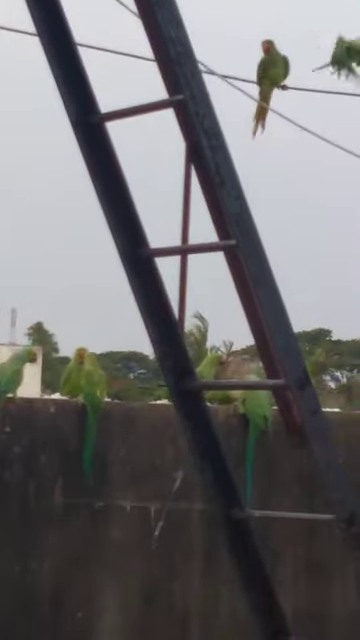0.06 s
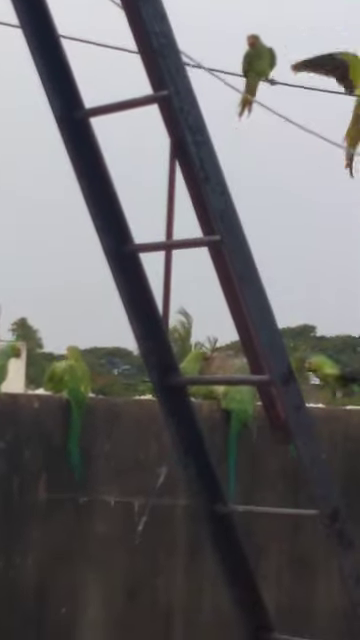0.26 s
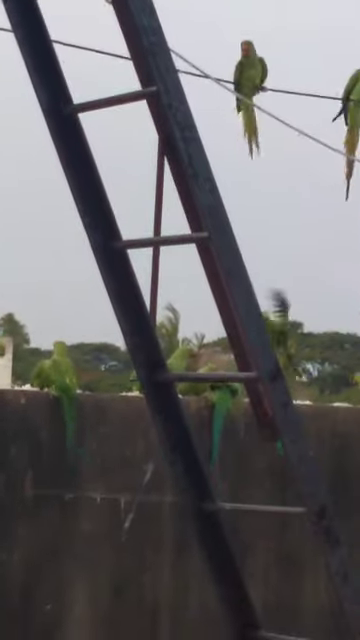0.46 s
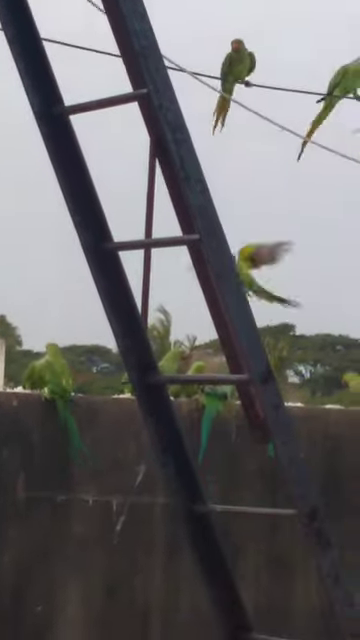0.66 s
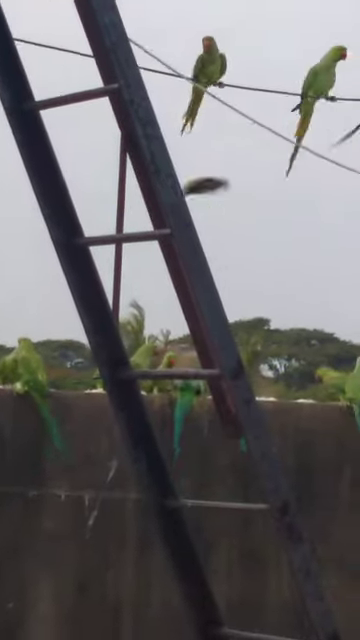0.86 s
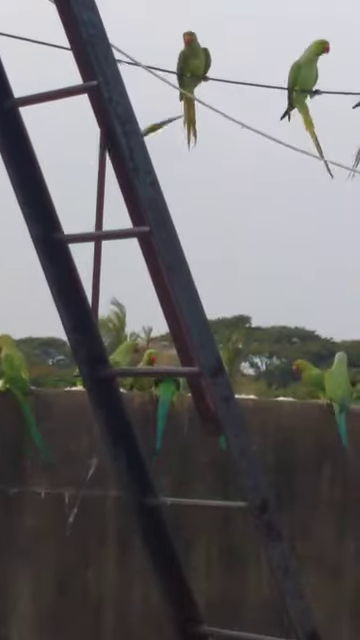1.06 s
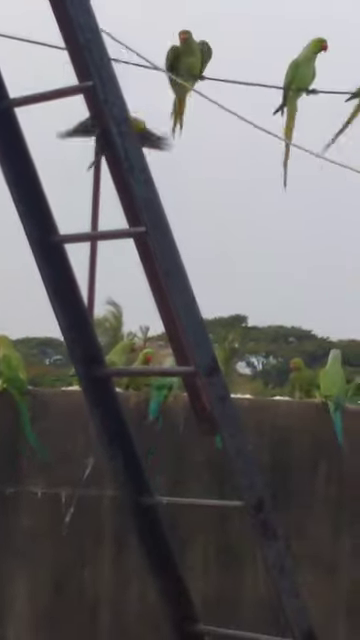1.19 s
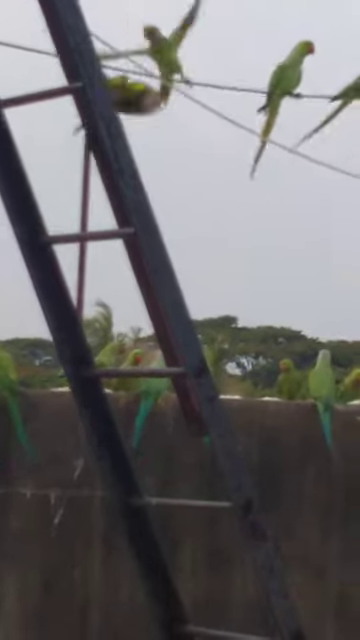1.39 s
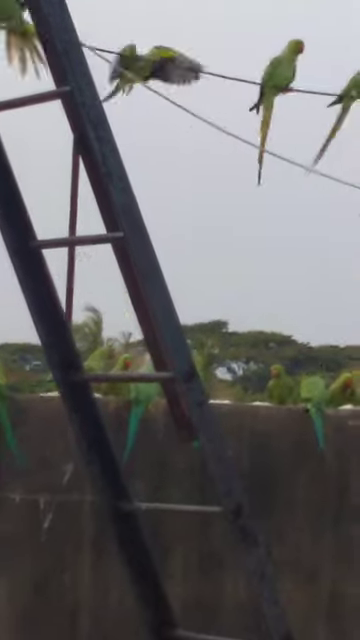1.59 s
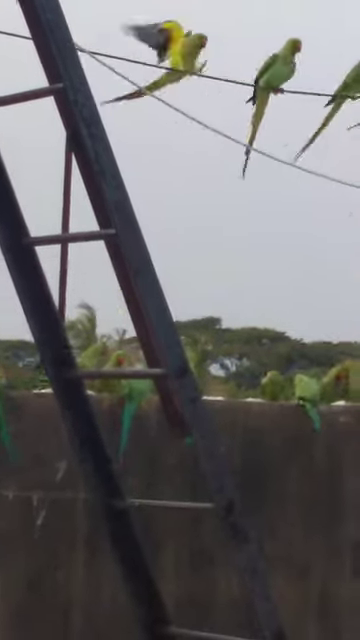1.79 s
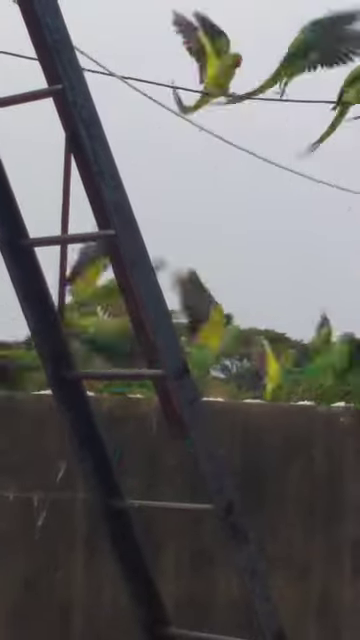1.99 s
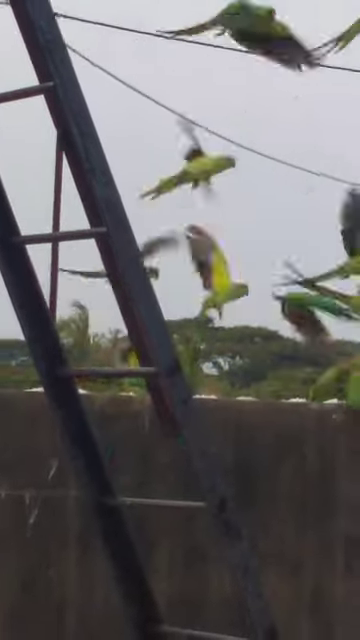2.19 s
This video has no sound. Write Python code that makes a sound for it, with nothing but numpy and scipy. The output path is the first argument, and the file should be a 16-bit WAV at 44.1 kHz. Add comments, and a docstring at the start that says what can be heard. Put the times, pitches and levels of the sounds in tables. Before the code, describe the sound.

Harsh, bright parakeet calls leap up and fall, about four a second, with short echoes from rooftop walls; a few softer calls, faint distant hum, then low gusts and a final cluster of wingbeats.

```python
"""Town noise and a wavering hum come first; over them a parakeet on a rooftop screeches eight times in a fast run.
Each call is a sum of partials of a pitch that leaps up, arches and falls, shaped by throat resonances and
roughened by modulation and hiss; the first two warble, and three softer calls join in.
Walls and parapets return the calls as echoes and decaying noise. Filtered noise makes the late gusts that rumble
on the microphone and the wings: a faint rustle, one early puff and a cluster of beats at the end."""
import sys
import numpy as np
from scipy import signal
from scipy.fft import rfft, irfft
from scipy.io import wavfile

SR = 44100
rng = np.random.default_rng(int(sys.argv[2]) if len(sys.argv) > 2 else 0)


def int16_out(signal):
    """Quantize to a 16-bit WAV file."""
    q = np.round(np.clip(np.atleast_2d(signal).T, -1, 1) * 32767)
    wavfile.write(sys.argv[1], SR, q.astype(np.int16))


def ratio(d):
    """dB to gain"""
    e = np.asarray(d, float) / 20
    return 10 ** e


N = 99225
TIME = np.arange(N) / SR

# Relative noise spectrum of the town: (frequency [Hz], level [dB])
TOWN_SPECTRUM = [(15, -10), (25, 0.5), (104, 0.5), (204, -5), (297, -3.5), (457, -6.5), (567, -18),
                 (762, -2.5), (1050, -10.5), (1380, -6.5), (2490, -3), (2920, -26.5), (3170, -16),
                 (15500, -49)]
TOWN_DB = -44.5
# Tones of the hum: (frequency [Hz], mid level [dB])
HUM_TONES = [(361, -62), (394, -60), (570, -64)]
# Strength of the wind's deep rumble: (time [s], level [dB])
GUST_LEVEL = [(1.45, -51), (1.536, -76), (1.572, -40.5), (1.648, -35.5), (1.744, -43), (1.78, -60),
              (1.938, -44), (1.966, -65), (1.99, -41), (2.084, -40), (2.108, -55), (2.142, -38.5),
              (2.2, -45)]
GUST_CUT_HZ, GUST_LUMPS_DB = 55, 2
# Single puffs of the wings: (start time [s], peak level [dB])
WING_PUFFS = [(.39, -50), (2.061, -67), (2.115, -56), (2.201, -57), (2.24, -46)]
# Continuous rustle of feathers: (time [s], level [dB])
FEATHER_RUSTLE = [(0, -68), (.2, -69.5), (1.599, -83), (2.0, -63), (2.25, -58)]
WING_RISE_S, WING_LOW_HZ = 0.025, 1500

# Echoes from parapet and floor, relative to the direct sound: (delay [s], level [dB])
NEAR_ECHOES = [(.006, -11.5), (.0095, -8), (.017, -25.5), (.026, -18.5)]
# Time for the scattered sound to fall 60 dB: (frequency [Hz], decay time [s])
ROOF_DECAY = [(1000, 1), (2300, 0.67), (4500, 0.59), (9000, 0.43), (16000, 0.75)]
# Relative starting spectrum of the scattered sound: (frequency [Hz], level [dB])
ROOF_SPECTRUM = [(2000, -0.5), (5000, -1), (9000, 0), (16000, -4)]
ROOF_DB, ROOF_BUILD_S = -8.5, 0.0033  # scattered energy against direct; time constant of its onset

# Arched calls, one contour each: (time [s], pitch [Hz], level [dB], hoarseness [0-1])
ARCHED_CALLS = [
    [(0.657, 1360, -36, 0), (0.669, 1412, -33.5, 0.22), (0.683, 2124, -32, 0.3), (0.689, 2457, -17, 0.27),
     (0.691, 2445, -21.5, 0), (0.707, 2448, -23.5, 0.33), (0.721, 2470, -22.5, 0.02),
     (0.751, 2199, -17.5, 0.3), (0.765, 2068, -21, 0), (0.785, 1892, -21, 0.33), (0.802, 1514, -44, 0.1)],
    [(0.892, 1335, -26, 0.22), (0.902, 1406, -39.5, 0.2), (0.916, 1956, -23.5, 0), (0.922, 2156, -23, 0),
     (0.93, 2361, -19.5, 0), (0.956, 2366, -18, 0), (0.994, 2128, -23.5, 0.04), (1.014, 1910, -22.5, 0.1),
     (1.022, 1767, -28, 0.03), (1.037, 1514, -37, 0.22)],
    [(1.117, 1380, -42, 0), (1.127, 1484, -40, 0), (1.133, 1700, -35, 0.22), (1.147, 2237, -18, 0.1),
     (1.151, 2388, -18, 0), (1.161, 2350, -17, 0.12), (1.181, 2477, -25, 0.33), (1.207, 2238, -16.5, 0.25),
     (1.221, 2165, -21, 0.25), (1.245, 1870, -22, 0.22), (1.265, 1430, -35, 0.3)],
    [(1.353, 1414, -48, 0), (1.365, 1444, -38, 0.22), (1.379, 1837, -30, 0.3), (1.395, 2282, -20.5, 0.17),
     (1.413, 2366, -23.5, 0.33), (1.429, 2287, -21.5, 0.22), (1.449, 2237, -17, 0.1),
     (1.467, 2047, -19.5, 0.02), (1.483, 1824, -22.5, 0), (1.5, 1550, -40, 0)],
    [(1.597, 1190, -39, 0.2), (1.609, 1336, -44, 0), (1.617, 1623, -33, 0.3), (1.631, 2222, -24, 0.1),
     (1.635, 2371, -20, 0.14), (1.661, 2441, -23, 0), (1.685, 2235, -19.5, 0.22), (1.717, 1885, -21, 0.3),
     (1.733, 1784, -33.5, 0.33), (1.745, 1530, -40, 0.22)],
    [(1.837, 1357, -61, 0.22), (1.849, 1457, -39.5, 0.1), (1.863, 2078, -26.5, 0.22),
     (1.871, 2345, -21.5, 0.1), (1.901, 2360, -21, 0.27), (1.935, 2190, -19.5, 0), (1.957, 1978, -27, 0.2),
     (1.967, 1880, -22, 0.3), (1.98, 1540, -37, 0.2)],
]
# Warbling calls, one mean contour each: (time [s], pitch [Hz], level [dB], hoarseness [0-1])
WARBLING_CALLS = [
    [(.176, 1344, -51, 0.1), (.194, 1826, -35.5, .2), (.205, 2373, -28, .2), (.22, 2563, -27, 0.31),
     (.23, 2330, -24, 0.2), (.245, 2357, -26, 0.3), (.262, 2160, -20, 0.27), (.272, 2102, -17.5, 0.04),
     (.277, 1925, -28, 0.26), (.298, 1850, -21, 0.3), (.314, 1650, -30.5, .2)],
    [(.428, 1396, -45, .2), (.444, 1874, -31, .2), (.455, 2391, -27, 0.3), (.48, 2275, -27, 0.33),
     (.5, 2147, -23.5, 0.22), (.518, 2110, -22, 0.31), (.54, 2054, -24, 0.3), (.556, 1860, -26, .2),
     (.574, 1480, -28.5, .2)],
]
# Soft level-pitched calls: (start time [s], length [s], pitch [Hz], level [dB])
SOFT_CALLS = [(0.601, 0.11, 2110, -37.5), (0.812, 0.049, 2083, -38.5), (2.1, 0.1, 1950, -44.5)]
# Pitch swing each way, before rounding of the wave: (time [s], swing [Hz])
WARBLE_SWING = [(.215, 0), (.23, 170), (.245, 40), (.3, 40), (.445, 0), (.456, 170), (.49, 230), (.52, 270),
                (.545, 210), (.56, 60), (.575, 0)]
WARBLE_PER_S, WARBLE_TOP_S = 102, 0.506  # rate, and a moment when the pitch is at its top
# Source strength of partials 1-9 before the throat: level [dB]
SOURCE_PARTIALS = [1.5, 2, -5, -4.5, -9.5, -17, -17.5, -28, -21]
# Resonances and gaps of the throat: (frequency [Hz], gain [dB])
THROAT_RESPONSE = [(1000, -17), (1700, -13), (2300, 3), (2650, -3), (3000, 7.5), (3700, 0), (4600, 7),
                   (5150, -6.5), (5750, 2.5), (6300, -6.5), (6750, -11), (7300, -6.5), (8100, -2.5),
                   (9300, 2.5), (10500, -8.5), (11700, -1.5), (13100, -11), (14200, -2), (15600, -6.5)]
# Colour of each main call: (fundamental gain [dB], third-partial gain [dB], gain of partials above it [dB])
CALL_COLOURS = [(1, 2, 0.5), (0, 3.5, 1), (-3, -1.5, -1), (1.5, 1, 2.5), (0, -1.5, -1.5), (-0.5, 1.5, -1),
                (0, 0.5, -2), (0.5, -1.5, -1)]
# Colour shared by the soft calls: the same three gains [dB]
SOFT_COLOUR = (15, -15, -15)

# Hoarseness is full at both edges of a call and never below its least value
HARSH_START_S, HARSH_FADE_S, LEAST_HOARSE = 0.03, 0.012, 0.22
JITTER_SHARE = 0.04  # spread of the pitch, as a share of it, at full hoarseness
SHIMMER_DB, RASP_DB, BREATH_DB = 5, -2, -8  # at full hoarseness, before the scaling by partial or beak
STEADY_FUNDAMENTAL, ROUGHER_PER_PARTIAL = 0.43, 0.2  # shares of the hoarseness
FADING_DB = 0.6  # slow level spread added per partial, up to the fifth
HISS_SLOPE = 0.35  # amplitude falls as frequency to this power
THROB_DEPTH, THROB_PER_S = 0.35, 160  # scale of the uneven depth, mean pulse rate
FUNDAMENTAL_SAG_DB = -8  # change of the fundamental from start to end
CLOSED_BEAK_DB, BEAK_OPENS_S = -8, 0.03
EDGE_S = 0.008


def at_hz(points, hz):
    """Pitch perception is logarithmic: reads a (Hz, value) table on a log axis."""
    hz_points, values = np.transpose(points)
    return np.interp(np.log(hz), np.log(hz_points), values)


def rms_one(x):
    """Mean power sets the level: scales to rms 1."""
    return x / np.sqrt(np.mean(x ** 2) + 1e-20)


def drift(rate, size):
    """Low-pass filtered noise is slow random variation: two poles at rate [Hz], spread 1."""
    r = np.exp(-2 * np.pi * rate / SR)
    slow = signal.lfilter([1], [1, -2 * r, r * r], rng.standard_normal(size + 8000))[8000:]
    return rms_one(slow - slow.mean())


def cut(x, hz, kind):
    """Second-order Butterworth filtering: kind "high" or "low" names what passes."""
    return signal.sosfilt(signal.butter(2, hz, kind, fs=SR, output="sos"), x)


def bands(shape):
    """Superposition of third-octave noise bands, each scaled by shape(centre Hz)."""
    edges = 25 * 2 ** (np.arange(29) / 3)
    white = rng.standard_normal((2, N))  # neighbouring bands use different noise
    total = 0
    for k, (lo, hi) in enumerate(zip(edges, edges[1:])):
        band_filter = signal.butter(2, [lo, hi], "band", fs=SR, output="sos")
        total = total + shape(np.sqrt(lo * hi)) * signal.sosfilt(band_filter, white[k % 2])
    return total


def town():
    """Incoherent sum of far sources: traffic and chatter as flickering noise bands, with a wavering hum."""
    wash = rms_one(bands(lambda hz: ratio(at_hz(TOWN_SPECTRUM, hz) + 1.83 * drift(18, N))))
    hum = 0
    for hz, db in HUM_TONES:
        strength = np.sqrt(2) * ratio(db + 3.5 * drift(12, N))
        hum = hum + strength * np.sin(2 * np.pi * hz * TIME + 1.9 * drift(4.65, N))
    return ratio(TOWN_DB) * wash + hum


def wind():
    """Turbulent pressure at the microphone: lumpy low noise that sets in late, brighter when strong."""
    s, db = np.transpose(GUST_LEVEL)
    white = cut(rng.standard_normal((2, N)), 25.4, "high")
    onset = np.clip((TIME - s[0]) / (s[1] - s[0]), 0, 1)
    level = onset * ratio(np.interp(TIME, s, db) + GUST_LUMPS_DB * drift(22, N))
    deep = rms_one(cut(white[0], GUST_CUT_HZ, "low"))
    bright = rms_one(cut(white[1], 193, "low"))
    return level * (deep + ratio(-5) * level / level.max() * bright)


def wings():
    """Amplitude-modulated broadband noise: a bright rustle of feathers with single puffs."""
    s, db = np.transpose(FEATHER_RUSTLE)
    level = ratio(np.interp(TIME, s, db) + 1.4 * drift(5, N))
    for start_s, peak_db in WING_PUFFS:
        late = np.maximum(TIME - start_s, 0) / WING_RISE_S
        level = level + ratio(peak_db) * np.e * late * np.exp(-late)
    return level * rms_one(cut(rng.standard_normal(N), WING_LOW_HZ, "high"))


def rooftop(x):
    """Convolution with an impulse response: near echoes, then scattered sound that decays band by band."""
    tail = bands(lambda hz: ratio(at_hz(ROOF_SPECTRUM, hz) - 60 * TIME / at_hz(ROOF_DECAY, hz)))
    tail = tail * (1 - np.exp(-TIME / ROOF_BUILD_S))
    response = ratio(ROOF_DB) * tail / np.sqrt(np.sum(tail ** 2))
    response[0] += 1  # direct sound
    for delay_s, db in NEAR_ECHOES:
        response[int(delay_s * SR)] += ratio(db)
    return signal.fftconvolve(x, response)[:N] / np.sqrt(np.sum(response ** 2))


def wavering_phase(t, hz, hoarse):
    """Frequency modulation: warble and random jitter move the pitch, whose running sum is the phase."""
    swing_hz = np.interp(t, *np.transpose(WARBLE_SWING))
    wave = np.tanh(2 * np.cos(2 * np.pi * WARBLE_PER_S * (t - WARBLE_TOP_S)))  # flattened tops
    hz = hz + swing_hz * wave
    hz = hz * (1 + JITTER_SHARE * hoarse * drift(257, len(t)))
    return hz, 2 * np.pi * np.cumsum(hz) / SR


def partials(t, hz, phase, hoarse, colour, closed_db):
    """Source-filter principle: harmonics weighted by the throat, each with its own flutter and rasp."""
    fundamental_db, third_db, upper_db = colour
    size = len(t)
    sag_db = FUNDAMENTAL_SAG_DB * (((t - t[0]) / (t[-1] - t[0])) ** 2 - 1 / 2)
    voice, power = 0, 0
    for k, source_db in enumerate(SOURCE_PARTIALS, 1):
        db = source_db + at_hz(THROAT_RESPONSE, k * hz)
        if k == 1:
            db = db + fundamental_db + sag_db
        if k == 3:
            db = db + third_db
        if k > 3:
            db = db + upper_db
        if k > 2:
            db = db + closed_db
        gain = ratio(db) * (k * hz < SR / 2.3)  # silent near half the sample rate
        shake = hoarse * (STEADY_FUNDAMENTAL if k == 1 else 1 + ROUGHER_PER_PARTIAL * (k - 2))
        shimmer_db = SHIMMER_DB * np.sqrt(shake) * drift(99, size)
        fading_db = FADING_DB * min(k - 1, 4) * drift(25, size)
        rasp = ratio(RASP_DB) * shake * drift(740, size)
        voice = voice + gain * (ratio(shimmer_db + fading_db) + rasp) * np.sin(k * phase + k)
        power = power + gain ** 2 / 2
    return voice / np.sqrt(power)


def breath(size):
    """Turbulent airflow: white noise filtered by the throat, at rms 1."""
    bins_hz = np.fft.rfftfreq(size, 1 / SR) + 1
    colour = ratio(at_hz(THROAT_RESPONSE, bins_hz)) / bins_hz ** HISS_SLOPE
    hiss = irfft(rfft(rng.standard_normal(size)) * colour, size)
    return rms_one(cut(hiss, 1630, "high"))


def throb(size):
    """Amplitude modulation: the whole voice pulses at an uneven rate and depth."""
    phase = np.cumsum(1 + 0.5 * drift(27.4, size)) * 2 * np.pi * THROB_PER_S / SR
    depth = THROB_DEPTH * np.clip(0.39 + 0.5 * drift(20, size), 0, 2)
    return 1 + depth * np.sin(phase)


def screech(rows, colour):
    """Voiced and turbulent excitation combined: partials and hiss follow one contour of pitch and level."""
    s, hz, db, hoarse = np.transpose(rows)
    start = int(s[0] * SR)
    t = TIME[start:int(s[-1] * SR)]
    since, left = t - t[0], t[-1] - t
    hz, db, hoarse = (np.interp(t, s, column) for column in (hz, db, hoarse))
    steady = np.clip(np.minimum(since - HARSH_START_S, left) / HARSH_FADE_S, 0, 1)
    hoarse = 1 - steady * (1 - np.clip(hoarse, LEAST_HOARSE, 1))
    closed_db = CLOSED_BEAK_DB * np.clip(1 - since / BEAK_OPENS_S, 0, 1)  # upper partials rise as it opens
    hz, phase = wavering_phase(t, hz, hoarse)
    voice = partials(t, hz, phase, hoarse, colour, closed_db)
    voice = voice + ratio(BREATH_DB + closed_db / 2) * hoarse * breath(len(t))
    edge = np.clip(np.minimum(since, left) / EDGE_S, 0, 1)
    out = np.zeros(N)
    out[start:start + len(t)] = voice * throb(len(t)) * ratio(db) * edge
    return out


def birds():
    """Linear superposition of all calls: eight main ones and the soft ones."""
    calls = sum(map(screech, list(WARBLING_CALLS) + list(ARCHED_CALLS), CALL_COLOURS))
    for s, length, hz, db in SOFT_CALLS:
        calls = calls + screech([(s, hz, db, 0.2), (s + length, hz, db, 0.2)], SOFT_COLOUR)
    return calls


def scene():
    """Superposition at one microphone: birds in their echo over town, wind and wings."""
    return (town() + wind() + wings() + rooftop(birds()))[None, :]


def top_cut(x):
    """Nothing passes above the cut-off."""
    return signal.sosfilt(signal.butter(12, 16290, fs=SR, output="sos"), x)


def record(dry):
    """Signal chain: the finished mix goes through the last stage at unchanged gain."""
    return top_cut(dry)


dry = scene()
out = record(dry)
int16_out(out)
```